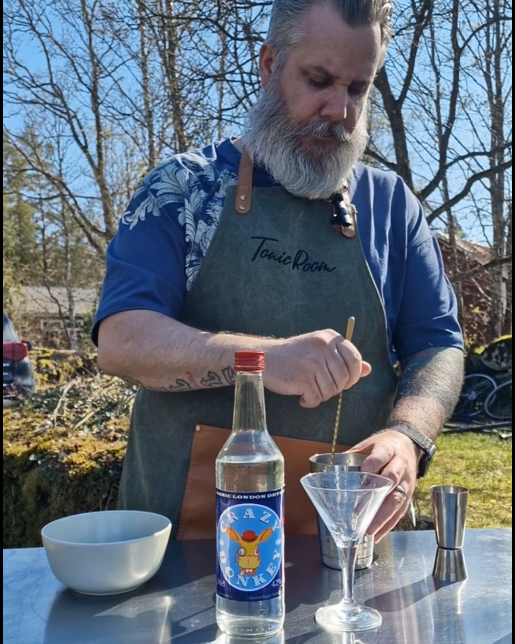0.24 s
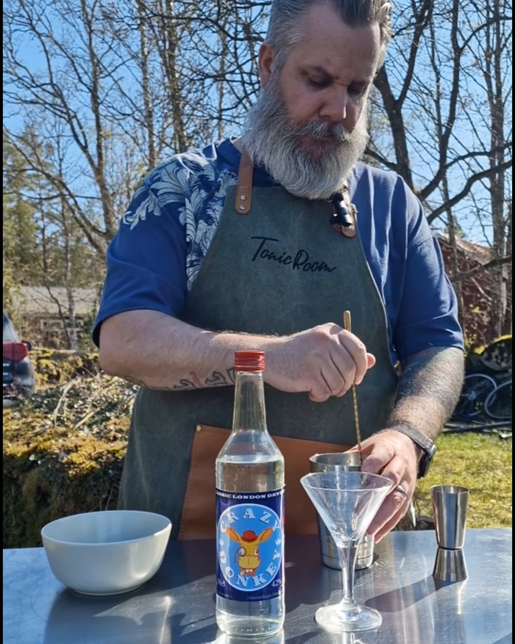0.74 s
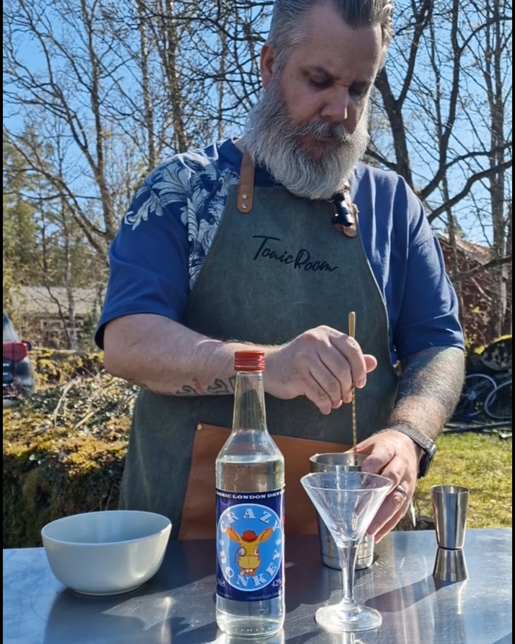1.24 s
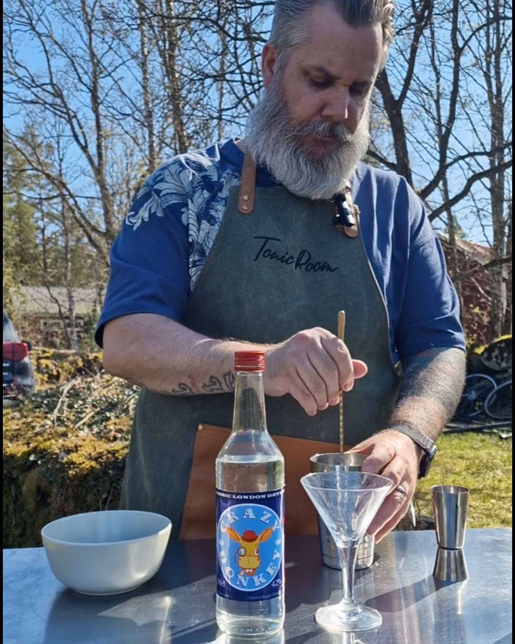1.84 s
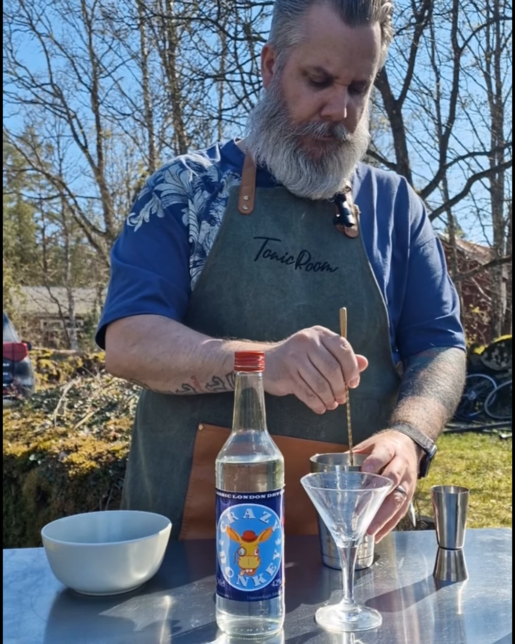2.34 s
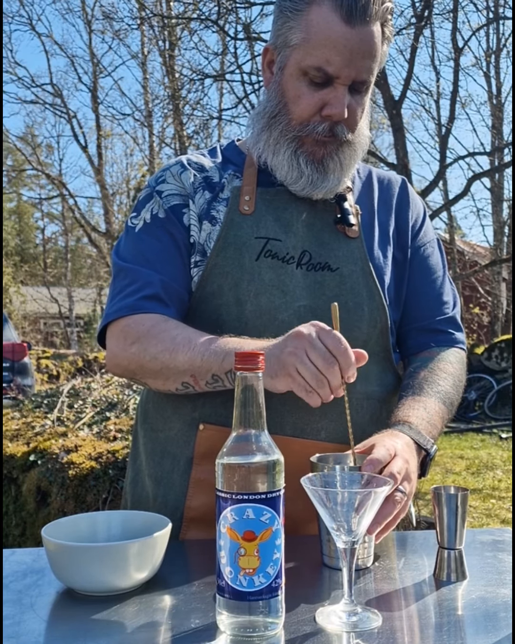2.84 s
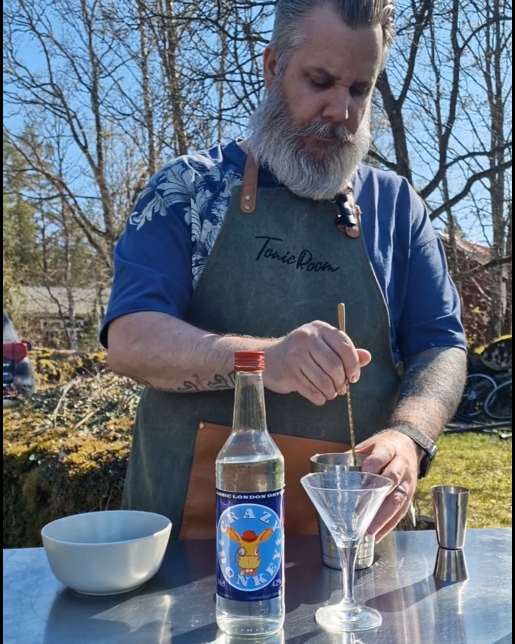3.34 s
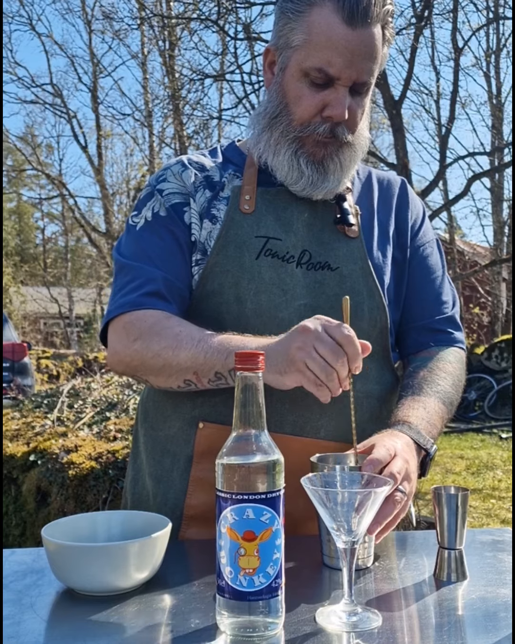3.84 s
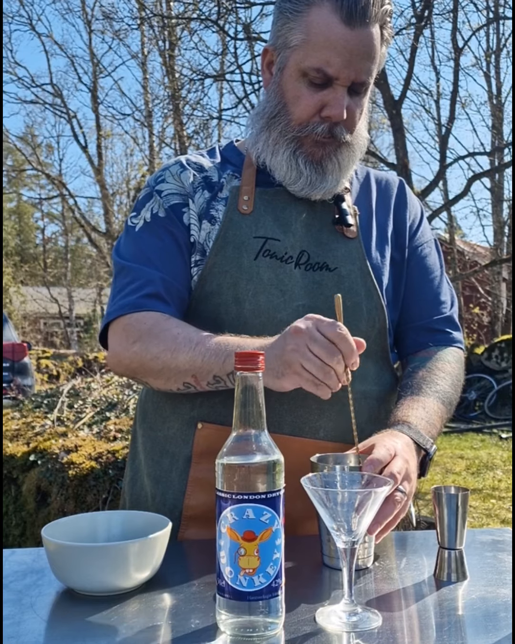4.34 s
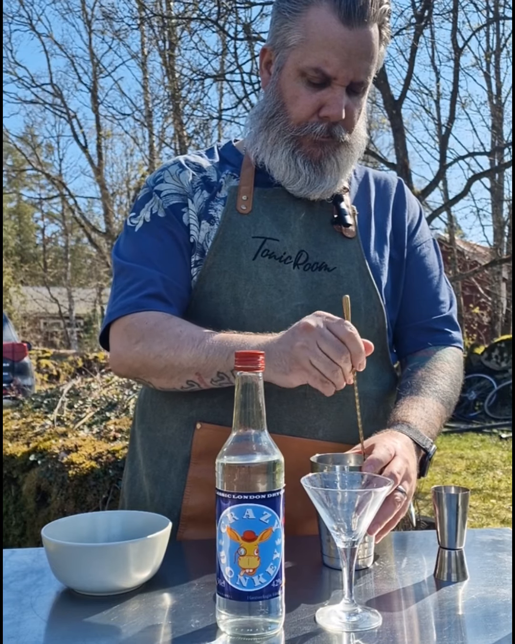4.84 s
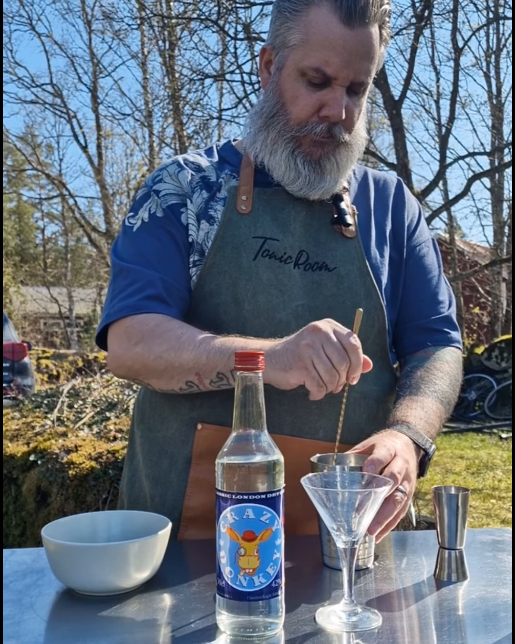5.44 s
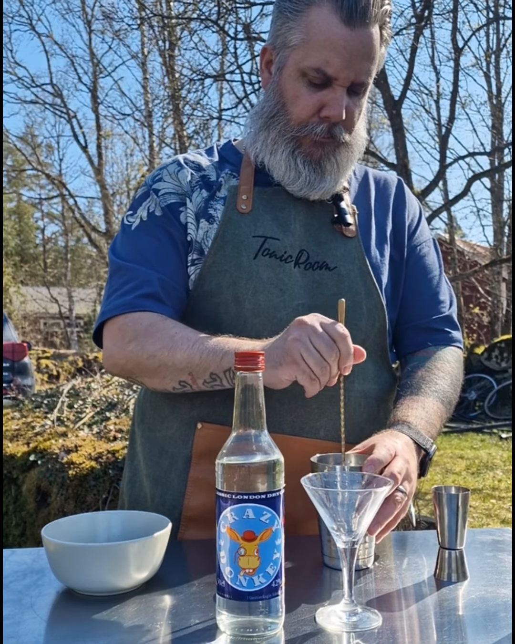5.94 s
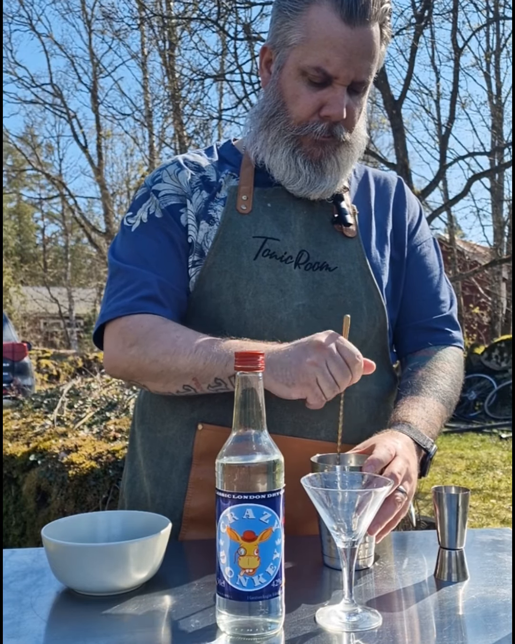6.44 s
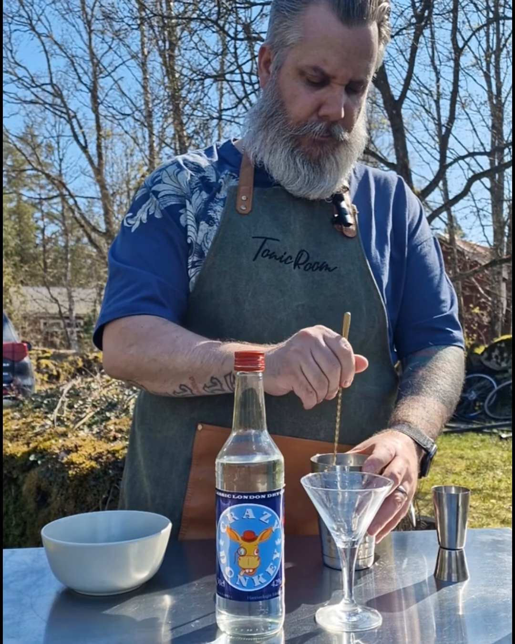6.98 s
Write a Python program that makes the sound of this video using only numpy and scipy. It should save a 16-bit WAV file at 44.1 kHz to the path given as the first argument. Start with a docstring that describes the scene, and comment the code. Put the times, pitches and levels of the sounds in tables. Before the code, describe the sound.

Ice cubes knock, rub and snap against the short, damped ring of a hand-held steel tin as a spoon pushes them round in liquid. The tin's hollow answers with dull honks and its base softly thuds the table. Activity comes in uneven flurries, strongest at the start, middle and around five and a half seconds, with a quiet tail. Close, dry outdoor pickup, faint air, and a few low rumbling gusts on the microphone.

```python
"""Outdoors, at a metal table: a long spoon stirs ice and liquid in a hand-held steel tin.
Cubes knock, grind and scrape on the damped wall; the hollow of the tin honks and the table thuds:
contact clicks ring banks of modes, with bursts of bright noise for the ice itself.
Trapped air gulps as gliding sines; wind buffets the microphone as gusts of low noise over faint air."""
import sys
import numpy as np
from scipy import signal
from scipy.fft import rfft, irfft, next_fast_len
from scipy.io import wavfile

SR = 44100
rng = np.random.default_rng(int(sys.argv[2]) if len(sys.argv) > 2 else 0)


def attenuation_scalar(level_db):
    """Turn a level in dB into a linear amplitude multiplier (20 dB per decade)."""
    decades = np.asarray(level_db, float) / 20
    return 10 ** decades


def bounce(signal):
    """Save signal as a 16-bit WAV file at the path given by the first command-line argument."""
    frames = np.transpose(np.atleast_2d(signal))
    limited = np.clip(frames, -1, 1)
    pcm = np.round(limited * 32767).astype(np.int16)
    wavfile.write(sys.argv[1], SR, pcm)


N = 317942

# ice on the wall: t/s, wall level/dB, favoured wall pitch f/Hz, hollow level/dB, swell/s
KNOCKS = [(0.0256, -15.5, 2580, -9, .013), (0.082, -12, 4200, -34, 0.0017), (0.093, -12, 3740, -37, 0.0014),
          (.128, -8.5, 2300, -8, 0.0015), (.169, -8, 3180, -26.5, 0.002824),
          (.182, -11, 3410, -28.5, 0.0036), (0.198, -6, 3630, -30, 0.0022), (0.211, -20.5, 3470, -31, .002),
          (0.2489, -11, 2360, -35.5, 0.0015), (.297, -20.5, 3750, -30, 0.0018),
          (0.3779, -7, 2045, -17, 0.011), (0.4246, -7, 1920, -34, 0.0067),
          (0.4371, -13.5, 1970, -11.5, 0.016), (.4697, -0.5, 3920, -11.5, .011),
          (0.4974, -18.5, 2800, -9, 0.022), (0.5761, -26, 2080, -75.5, 0.0054),
          (0.613, -10, 2440, -17, 0.0012), (0.654, -15.5, 2000, -25, 0.0022),
          (.737, -27, 2260, -40, 0.0022), (0.775, -31, 2370, -21.5, 0.016),
          (0.9136, -7.5, 3480, -28, 0.0022), (0.9279, -20, 5100, -32.5, 0.0011),
          (1.075, -36.5, 2560, -32.5, 0.0069), (1.112, -37.5, 4550, -43, 0.017),
          (1.43, -12.5, 4100, -46, 0.018), (1.461, -17.5, 4000, -36, 0.0027),
          (1.534, -19, 2310, -42, 0.018), (1.5722, -20, 2700, -31, 0.00059), (1.609, -16, 2940, -23, 0.03),
          (1.6432, -23, 3800, -73, 0.0011), (1.7414, -29.5, 3350, -33, 0.0031),
          (1.8625, -32, 2760, -29, 0.0033), (2.0371, -14.5, 1890, -10.5, .008),
          (2.0909, -10.5, 3110, -17.5, 0.0043), (2.1162, -14, 2210, -29, 0.016),
          (2.176, -35, 2356, -23.5, 0.0026), (2.2763, -20, 2800, -16, .019),
          (2.3352, -10, 2940, -21, 0.0057), (2.4, -24.5, 2750, -32, 0.0047),
          (2.547, -20.5, 4470, -28.5, 0.01), (2.642, -9.5, 1900, -15.5, 0.012),
          (2.781, -10, 2580, -9, .003), (2.805, -34, 3700, -27, 0.0023), (2.848, -25.5, 4500, -36, 0.0062),
          (2.864, -6.5, 4520, -17, 0.011), (2.888, -6.5, 3740, -9.5, .003), (2.945, -23, 2780, -10, 0.0014),
          (2.9886, -16, 3100, -39, 0.0019), (3.0242, -15.5, 3480, -19, 0.0012),
          (3.0533, -25, 2120, -64, 0.0019), (3.1426, -26, 2110, -25.5, 0.0082),
          (3.1834, -15.5, 2760, -17.5, 0.03), (3.2937, -8.5, 2440, -12, 0.0025),
          (3.349, -6, 2900, -35, 0.026), (3.3784, -18, 2100, -15.5, 0.014), (3.5358, -9, 2390, -11, 0.0021),
          (3.742, -38.5, 2770, -29, .005), (3.816, -21, 4660, -43, 0.0013),
          (3.833, -12, 4500, -31.5, 0.0015), (3.909, -14.5, 2170, -27, 0.0081),
          (3.9534, -16, 5260, -24, 0.005), (4.0019, -18.5, 4300, -26, 0.0011),
          (4.0959, -17, 3300, -45, 0.0079), (4.3253, -13, 2640, -14.5, 0.0077),
          (4.384, -23.5, 5120, -65, 0.0019), (4.5057, -24, 1780, -13.5, 0.0061),
          (4.5737, -18, 4840, -22, 0.01), (4.607, -7.5, 4770, -63, 0.0016), (4.629, -16, 3330, -50, 0.0061),
          (4.7186, -16.5, 2500, -15, .007), (4.825, -11, 2000, -9, 0.0024), (4.868, -6.5, 2330, -39, 0.011),
          (4.9485, -20, 2370, -44.5, 0.0082), (4.9681, -7.5, 2300, -15, 0.011),
          (4.9927, -12, 3350, -9.5, 0.014), (5.0547, -21, 4020, -20.5, 0.0019),
          (5.1576, -21.5, 2200, -59.5, 0.0041), (5.193, -19, 3320, -28.5, 0.0023),
          (5.2294, -7, 2240, -17.5, 0.0051), (5.2486, -13, 1880, -16, 0.0058),
          (5.2685, -12.5, 2500, -13.5, 0.023), (5.2964, -7.5, 3740, -34.5, 0.015),
          (5.452, -13.5, 4800, -27.5, 0.014), (5.467, -23.5, 2180, -23, 0.008),
          (5.545, 1.5, 4100, -24.5, 0.0033), (5.553, -9, 3980, -32, 0.0025),
          (5.581, -24.5, 2820, -27, 0.00056), (5.637, -21.5, 2750, -3, 0.002),
          (5.667, -22.5, 2860, -43, 0.0012), (5.7115, -5, 2010, -37, 0.0031), (5.724, -23, 2300, -48, .002),
          (5.7515, -15, 2510, -63, 0.0019), (5.789, -20.5, 2160, -39, 0.019),
          (5.8114, -16, 4180, -15.5, .05), (6.24, -32, 3390, -44.5, 0.0094),
          (6.253, -14.5, 4800, -37.5, 0.0084), (6.263, -18, 2090, -42, 0.006),
          (6.296, -14.5, 3840, -24.5, 0.00083), (6.413, -46, 2880, -34.5, 0.0045),
          (6.602, -46, 5000, -45, 0.013), (6.887, -33.5, 3480, -37.5, 0.0053),
          (6.9374, -32, 4900, -27, 0.012), (6.962, -42.5, 2100, -27, 0.0007),
          (7.018, -41, 3200, -27.5, 0.017), (7.128, -22.5, 4430, -27, .014), (7.149, -21, 3220, -27, .004),
          (7.158, -20, 2080, -14.5, 0.0011)]
# spoon driving the ice round: t/s, vigour/dB, weight on the base of the tin/dB, favoured wall pitch f/Hz
STIR = [(0.0, -22.5, -5, 3250), (0.44, -29.5, -4, 2290), (0.5, -31, -5.5, 3033), (0.58, -28, -12, 2040),
        (1.02, -71.5, -2, 3780), (1.38, -58.5, -2.5, 3310), (1.63, -42.5, -9, 3466), (2.21, -27, 11, 2684),
        (2.35, -36, 3, 3395), (2.59, -43, 0, 2447), (2.89, -35.5, 11, 3554), (3.13, -34.5, 0, 2005),
        (3.37, -25.5, 2, 2900), (3.67, -40, 6, 2060), (3.84, -42.5, -1, 4960), (3.91, -30, 3, 2033),
        (3.97, -28, 8.5, 3380), (4.14, -35.5, -2, 3623), (4.36, -38, 1, 2640), (4.4, -43, 7, 4830),
        (4.46, -29.5, 4, 2260), (4.6, -28, -3, 4270), (4.96, -31.5, 1, 2034), (5.12, -30, -30, 4150),
        (5.24, -29.5, 3, 2025), (5.38, -40, -8, 3500), (5.48, -43, 21.5, 2016), (5.52, -60, -10, 4590),
        (5.72, -43.5, -1, 2240), (5.96, -68, -3, 2970), (6.26, -68, -13.5, 3035), (6.49, -50, 6, 3730),
        (6.95, -38.5, -7, 4810), (7.21, -52.5, -3, 2650)]
# liquid sloshing over the cubes cushions their blows: t/s, level change of upper wall modes and snap/dB
CUSHION = [(0, -16), (.7, -11.5), (.9, -8.5), (2.2, -4.5), (3.6, -7.5), (4.8, -7.5), (5.9, -13.5),
           (7.21, -1)]
# modes of the air in the tin: f/Hz, level/dB, t60/s
HOLLOW_MODES = [(406, 0.5, 0.017), (511.5, 0.5, 0.038), (591.4, -8.5, 0.12), (715, 2, 0.052),
                (790.2, 5, 0.032), (904, 2.5, 0.012), (1081, -18, 0.063), (1224, -19.5, 0.066),
                (1361, -7.5, 0.029), (1706, 1.5, 0.0046)]
# modes of the table: f/Hz, level/dB, t60/s
TABLE_MODES = [(83, -8.5, 0.037), (136.5, -0.5, 0.043), (235.5, -5, 0.068), (273.7, -4, 0.093),
               (320.4, -10.5, 0.08), (407.8, -13.5, 0.11)]


def rms_one(x):
    """Scale to unit rms."""
    return x / np.sqrt(np.mean(x ** 2) + 1e-20)


def in_time(table):
    """Columns of a curve table after its first, t/s: one value a sample."""
    s, *columns = np.transpose(table)
    return [np.interp(np.arange(N) / SR, s, column) for column in columns]


def drift(rate_hz):
    """Slow random curve of rms 1: noise at SR / 40 through a double pole, interpolated."""
    r = np.exp(-80 * np.pi * rate_hz / SR)
    slow = signal.lfilter([1], [1, -2 * r, r * r], rng.standard_normal(N // 40 + 2002))[2000:]
    return np.interp(np.arange(N) / 40, np.arange(len(slow)), rms_one(slow))


def ring(clicks, hz, t60_s):
    """A unit click rings a sine of height near 1; wet ice is a soft contact: only pitches near the mode pass."""
    r = 1000 ** (-1 / (t60_s * SR))
    w = 2 * np.pi * hz / SR
    wide = np.exp(-w / 16)
    mode = [0, np.sin(w), 0, 1, -2 * r * np.cos(w), r * r]
    soft_contact = [(1 - wide ** 2) / 2, 0, (wide ** 2 - 1) / 2, 1, -2 * wide * np.cos(w), wide ** 2]
    return signal.sosfilt([mode, soft_contact], clicks + 1e-18)


def noise(spectrum):
    """Steady noise coloured by (f/Hz, level/dB per Hz) over log frequency, rms 1."""
    size = next_fast_len(N)
    hz, db = np.transpose(spectrum)
    bin_hz = np.arange(1, size // 2 + 2) * SR / size
    colour = attenuation_scalar(np.interp(np.log(bin_hz), np.log(hz), db))
    return rms_one(irfft(rfft(rng.standard_normal(size)) * colour, size)[:N])


def grains(per_s, spread_db):
    """Random contacts in clumps, most small, a few large."""
    sizes = attenuation_scalar(spread_db * np.minimum(rng.exponential(1, N), 4.0)) * rng.choice([-1, 1], N)
    return sizes * (rng.random(N) < per_s * attenuation_scalar(3.0 * drift(25)) / SR)


def wall_modes():
    """Wall modes (f/Hz, level/dB, t60/s): hand and liquid damp each by 60 dB in the same count of cycles."""
    # modes of the steel wall: f/Hz, level/dB
    wall = [(2085, 5), (2260, -1), (2360, -3.5), (2650, -0.5), (2780, 2.5), (3100, -0.5), (3290, 4.5),
            (3420, -4.5), (3600, 1.5), (3870, 0), (4095, -2), (4380, -4.5), (4760, 1), (4890, -3.5),
            (5060, -5), (5370, -11), (5700, -7), (6300, -10), (6750, -8), (7350, -9), (8330, -8.5),
            (8900, -11.5), (9750, -15.5)]
    t60_cycles = 110
    return [(hz, db, t60_cycles / hz) for hz, db in wall]


def nearness(hz, favoured_hz):
    """Where the cube touches decides which wall modes sound most: 1 at the favoured pitch, 0 far off."""
    return np.exp(-(np.log2(hz / favoured_hz) / 0.13) ** 2)


def hollow_tilt_db(hz, s):
    """Level change of the upper hollow modes at time s: liquid climbing the wall darkens the hollow."""
    # liquid's effect on the upper hollow modes: t/s, level change/dB
    tilt = [(0, 6.5), (3.7, 4.5), (4.1, -10.5), (5.9, -5.5), (6.3, 2)]
    return np.interp(s, *np.transpose(tilt)) * (740 < hz < 1150)


def crack_bands():
    """Bright ice noise in five bands, so that each contact can have a colour of its own."""
    # bright snap and fizz of ice: f/Hz, level/dB per Hz
    crack = [(3060, -39.5), (5200, -9.5), (5850, -5.5), (6830, -15.5), (7860, -16), (8890, -11),
             (11300, -25), (14000, -22), (14800, -22.5), (16000, -54)]
    edges_hz = [2500, 6300, 8000, 10500, 13500, 18000]
    hiss = noise(crack)
    return [signal.sosfilt(signal.butter(2, band_hz, "band", fs=SR, output="sos"), hiss)
            for band_hz in zip(edges_hz, edges_hz[1:])]


def outdoor_air():
    """Faint coloured noise whose level drifts slowly."""
    # outdoor air: f/Hz, level/dB per Hz
    air_spectrum = [(24, -35.5), (40, -41), (276, -15.5), (646, -19), (790, -18.5), (1590, -28.5),
                    (2770, -13), (4800, -19), (16000, -31)]
    return attenuation_scalar(-69 + 2.4 * drift(6)) * noise(air_spectrum)


def rub_levels():
    """Rubbing in wall, hollow and table (dB): the steady stir plus cubes that slide on after each knock."""
    # sliding in wall, hollow, table: level against the knock/dB, fade/dB per s
    slide = [(-25.5, 203.5), (-14, 195.5), (-15.5, 188)]
    # steady rubbing of wall, hollow, table: level/dB against vigour (wall) or vigour plus weight
    rub_offsets = [-6.5, -3.5, -8.5]
    # short dips in the rubbing level: end t/s, length/s, depth/dB
    dips = [(0.337, 0.033, 20), (0.574, 0.015, 20), (.912, 0.137, 24), (2.268, 0.17, 21),
            (2.778, 0.068, 7.5), (3.142, 0.26, 11), (3.294, 0.078, 6), (4.326, 0.22, 8), (5.122, 0.023, 19),
            (5.453, 0.14, 12), (5.544, 0.036, 21), (5.634, 0.05, 28), (5.709, 0.032, 20),
            (7.071, 0.043, 2.5)]
    t = np.arange(N) / SR
    dip_db = sum(db * np.interp(t, [s - length_s, s - length_s / 4, s, s + .004], [0, 1, 1, 0])
                 for s, length_s, db in dips)
    vigour_db, weight_db, _ = in_time(STIR)
    s, wall_db, _, hollow_db, swell_s = np.transpose(KNOCKS)
    blow_at = ((s + swell_s) * SR).astype(int)
    pressed_db = vigour_db + weight_db
    levels_db = []
    for steady_db, knock_db, offset_db, (under_db, fade_db_per_s) in zip(
            (vigour_db, pressed_db, pressed_db), (wall_db, hollow_db, hollow_db), rub_offsets, slide):
        power = np.zeros(N)
        np.add.at(power, blow_at, attenuation_scalar(2 * (knock_db + under_db)))
        sliding = signal.lfilter([1], [1, -attenuation_scalar(-2 * fade_db_per_s / SR)], power + 1e-18)
        levels_db.append(10 * np.log10(attenuation_scalar(2 * (steady_db + offset_db)) + sliding) - dip_db)
    return levels_db


def grinding(levels_db, bands):
    """Dense small contacts ring wall, hollow and table; each mode swells and fades as the cubes move round."""
    favoured_hz = in_time(STIR)[2]
    rub = grains(per_s=1800, spread_db=4.2)
    # cubes rattling on each other and the wall: lone ticks sound every mode at once
    ticks = attenuation_scalar(-7) * grains(per_s=220, spread_db=5.5)
    touches, ticked = np.flatnonzero(rub), np.flatnonzero(ticks)
    out = 0
    bodies = (wall_modes(), HOLLOW_MODES, TABLE_MODES)
    for body, level_db, wander_db in zip(bodies, levels_db, (6, 5, 3)):
        rung = 0
        for hz, db, t60_s in body:
            at = touches[rng.random(len(touches)) < .15]
            place_db = 11.0 * nearness(hz, favoured_hz[at]) + hollow_tilt_db(hz, at / SR)
            share = np.zeros(N)
            share[at] = rub[at] * attenuation_scalar(db + wander_db * drift(8.7)[at] + place_db)
            share[ticked] += ticks[ticked] * attenuation_scalar(db + rng.normal(0.5, 7.0, len(ticked)))
            rung = rung + ring(share, hz, t60_s)
        out = out + attenuation_scalar(level_db) * rms_one(rung)
    fizz = sum(band * attenuation_scalar(6 * drift(14)) for band in bands)
    rasp_decay = np.exp(-1 / (0.0015 * SR))
    rasp = signal.lfilter([1], [1, -rasp_decay], np.abs(rub / 2 + ticks)) * fizz
    rasp_db = levels_db[0] + 1.73 * in_time(CUSHION)[0] + 4.5
    return out + attenuation_scalar(rasp_db) * rms_one(rasp)


def knocks(bands, count=20):
    """Each knock is a flurry of contacts that swells to a blow and rebounds; every mode gets its own share."""
    rebound_s, upper_hz = 0.018, 4300
    bright_db_per_octave, soft_db_per_s = -0.5, 108.5
    s, lower_db, favoured_hz, hollow_db, swell_s = np.transpose(KNOCKS)[:, :, None]
    upper_db = (lower_db + np.interp(s, *np.transpose(CUSHION)) - soft_db_per_s * swell_s
                + bright_db_per_octave * np.log2(favoured_hz / upper_hz))
    swell_s = np.clip(swell_s, .001, .05)

    # contact times against the blow, which is the first contact
    late_s = rng.random((len(s), count)) ** 1.5 * (swell_s + 3.0 * rebound_s) - swell_s
    late_s[:, 0] = 0
    at = np.clip(((s + swell_s + late_s) * SR).astype(int), 0, N - 1)
    fade_db = np.where(late_s < 0, 13 * late_s / swell_s, -8 * late_s / rebound_s) - 9
    fade_db += 4 * np.minimum(rng.exponential(1, late_s.shape), 2)   # a few contacts stand out
    fade_db[:, :1] = 1.0 - 450.0 * swell_s   # a sudden blow is hard, a slow one has no single edge

    def contacts(level_db):
        """Clicks of random sign and share."""
        clicks = np.zeros(N)
        chance = rng.standard_normal((len(s), 2, count))
        share_db = rng.uniform(-5.5, 5.5, (len(s), 1)) + 3 * chance[:, 1]
        np.add.at(clicks, at, np.sign(chance[:, 0]) * attenuation_scalar(level_db + fade_db + share_db))
        return clicks

    out = np.zeros(N)
    for hz, db, t60_s in wall_modes():
        wall_db = lower_db - 21.0 if hz < upper_hz else upper_db - 7.5
        out += ring(contacts(wall_db + db + 14.6 * nearness(hz, favoured_hz)), hz, t60_s)
    for hz, db, t60_s in HOLLOW_MODES:
        out += ring(contacts(hollow_db + db - 8.5 + hollow_tilt_db(hz, s)), hz, t60_s)
    for hz, db, t60_s in TABLE_MODES:   # dull blows that sound the hollow also shake the table
        out += ring(contacts(hollow_db + db - 26.0), hz, t60_s)
    snap_decay = np.exp(-1 / (0.0024 * SR))
    for band in bands:   # the ice itself snaps briefly
        out += band * signal.lfilter([1], [1, -snap_decay], np.abs(contacts(upper_db - 18.5)))
    return out


def bubbles(churn_db, count=320):
    """Gliding sines that swell, warble and die: large gulps, and many small ones, louder as the ice churns."""
    # air trapped under the ice: t/s, start f/Hz, end f/Hz, length/s, level before warble/dB
    gulps = [(0.026, 684, 1017, 0.027, -4), (.102, 1810, 3580, 0.018, -14), (.129, 733, 820, 0.012, -3.5),
             (.168, 735, 920, 0.022, -9.5), (.172, 1920, 2700, 0.0066, -12),
             (.27, 2030, 2860, 0.018, -14.5), (.542, 1910, 2500, 0.0061, -18),
             (0.047, 966, 800, 0.0082, -5), (0.47, 780, 850, 0.037, -4.5), (.509, 1040, 716, 0.0047, -7),
             (0.577, 1965, 2180, 0.014, -14), (2.555, 1965, 2500, 0.011, -16.5),
             (2.81, 1870, 2370, .015, -23), (2.867, 1006, 1340, 0.035, -7), (2.915, 1750, 2400, 0.011, -18),
             (2.989, 704, 1092, 0.017, -4.5), (3.0, 1140, 2600, 0.015, -18.5),
             (3.013, 2630, 3960, 0.006, -24), (5.01, 1637, 2417, 0.013, -18),
             (5.27, 1747, 2560, 0.033, -18.5), (6.316, 800, 854, 0.072, -25),
             (6.455, 870, 1003, 0.063, -25.5)]
    out, warble = np.zeros(N), drift(67)
    when, pitch, rise, size = rng.random((count, 4)).T
    when = when ** 2.2   # most trapped air escapes early
    small_hz = 1900 * 2.2 ** pitch
    churn_then_db = np.minimum(churn_db, -36.0)[(when * (N - .04 * SR)).astype(int)]
    small_db = 2 * churn_then_db + 10 * size + 30 - 5 * when
    small = zip(when * (N / SR - .04), small_hz, small_hz * (1 + .25 * rise), 20 / small_hz, small_db)
    for s, start_hz, end_hz, length_s, db in [*gulps, *small]:
        part = np.linspace(0, 1, int(length_s * SR))
        span = slice(int(s * SR), int(s * SR) + len(part))
        hz = start_hz * (end_hz / start_hz) ** part * (1 + 0.066 * np.tanh(warble[span]))
        phase = 2 * np.pi * np.cumsum(hz) / SR
        level = attenuation_scalar(db + 3 * np.tanh(warble[::-1][span]))
        out[span] += level * np.sin(np.pi * part ** .7) * np.sin(phase)
    return out


def bumps():
    """The tin rocks and its base softly pushes the table; every mode gets its own share."""
    # base on table: t/s, relative level/dB
    base_bumps = [(0.138, -11.5), (0.275, -23.5), (0.383, -14.5), (0.616, -13.5), (0.783, -18),
                  (2.277, -16), (2.358, -12), (2.665, -14.5), (2.786, -7.5), (2.918, -20), (3.201, -33),
                  (3.301, -6.5), (3.438, -29), (3.538, -6), (3.908, -12), (4.703, -18), (4.828, -9),
                  (4.987, -15), (5.288, -24.5), (5.46, -22.5), (5.635, -26.5), (5.838, -23)]
    contact_s = 0.0022
    s, db = np.transpose(base_bumps)
    out = 0
    for hz, mode_db, t60_s in TABLE_MODES:
        clicks = np.zeros(N)
        clicks[(s * SR).astype(int)] = attenuation_scalar(db + mode_db + 9.0 + 2 * rng.standard_normal(len(s)))
        out = out + ring(clicks, hz, t60_s)
    soft = np.exp(-1 / (contact_s * SR))
    return signal.lfilter([1 - soft], [1, -soft], out)


def wind():
    """Lumpy low pressure noise on the microphone in gusts, with calm between them."""
    # gusts: peak t/s, peak level/dB, rise/dB per s, fall/dB per s
    gusts = [(1.735, -15, 172, 1), (2.071, -15.5, 52, 313), (4.034, -4.5, 438, 410), (4.109, -14, 403, 204),
             (4.175, -18, 403, 228), (4.35, -32, 300, 16), (4.544, -23.5, 80.5, 542),
             (5.74, -32, 502.5, 500), (6.409, -8.5, 441, 181), (6.502, -13.5, 296, 81),
             (6.899, -31, 190, 147), (7.095, -26, 601, 142)]
    # wind noise: f/Hz, level/dB per Hz
    wind_spectrum = [(15, -30), (25, -34), (49, 6.5), (112, 2.5), (274, -19), (337, -27), (409, -34.5),
                     (450, -27.5), (580, -95.5)]
    gust_lasts_s, calm_db_per_s = 0.24, 263.5   # extra fall once a gust has lasted
    t, level_db = np.arange(N) / SR, -120
    for s, peak_db, rise, fall in gusts:
        fall_db = fall * (t - s) + calm_db_per_s * np.maximum(t - s - gust_lasts_s, 0)
        level_db = np.maximum(level_db, peak_db - np.where(t < s, rise * (s - t), fall_db))
    lumps = attenuation_scalar(3.5 * np.tanh(drift(24)))
    return attenuation_scalar(level_db) * rms_one(noise(wind_spectrum) * lumps)


def scrapes():
    """A cube slides along the wall and sings: noise in a narrow gliding band, swelling, fading, catching."""
    # singing slides: t/s, length/s, start f/Hz, end f/Hz, level before roughness/dB
    slides = [(1.715, 0.11, 2780, 2930, -43), (1.757, 0.14, 3250, 3230, -41.5),
              (1.954, 0.041, 3250, 3300, -35), (5.124, 0.077, 2150, 2210, -49),
              (5.156, 0.071, 3300, 3140, -32.5), (5.114, 0.078, 5000, 4980, -35.5),
              (5.668, 0.026, 5600, 5500, -32.5), (5.783, 0.11, 4140, 4000, -39),
              (5.769, .13, 2550, 2606, -30.5), (6.58, 0.12, 4700, 4830, -45),
              (6.695, 0.15, 4100, 4570, -40.5), (6.80, 0.055, 5000, 4800, -44.5),
              (6.89, 0.09, 4850, 4850, -37.5), (7.003, 0.06, 1400, 1400, -49)]
    width_share = .025   # of the start pitch
    out, rough = np.zeros(N), attenuation_scalar(7 * np.tanh(drift(70)) - 2)
    for s, length_s, start_hz, end_hz, db in slides:
        part = np.linspace(0, 1, int(length_s * SR))
        span = slice(int(s * SR), int(s * SR) + len(part))
        r = np.exp(-2 * np.pi * width_share * start_hz / SR)
        slow = signal.lfilter([1], [1, -2 * r, r * r], rng.standard_normal((2, 9000)))
        a, b = slow[:, -len(part):]
        phase = 2 * np.pi * np.cumsum(start_hz * (end_hz / start_hz) ** part) / SR
        band = rms_one(a * np.cos(phase) + b * np.sin(phase))
        out[span] += attenuation_scalar(db) * np.sin(np.pi * part) ** .5 * rough[span] * band
    return out


def scene():
    """Tin, table and faint air, high-passed at 60 Hz; wind added in full."""
    rub_db, bands = rub_levels(), crack_bands()
    near = outdoor_air() + grinding(rub_db, bands) + knocks(bands) + bubbles(rub_db[0]) + bumps() + scrapes()
    near = signal.sosfilt(signal.butter(2, 60.0, "high", fs=SR, output="sos"), near)
    return (near + wind())[None]


def top_cut(x):
    """Nothing passes above the cut-off."""
    return signal.sosfilt(signal.butter(12, 16140, fs=SR, output="sos"), x)


def record(dry):
    """Rounds the tallest peaks smoothly below 0.95."""
    rounded = dry / (1 + (dry / .95) ** 6) ** (1 / 6)
    return top_cut(rounded)


dry = scene()
out = record(dry)
bounce(out)
```